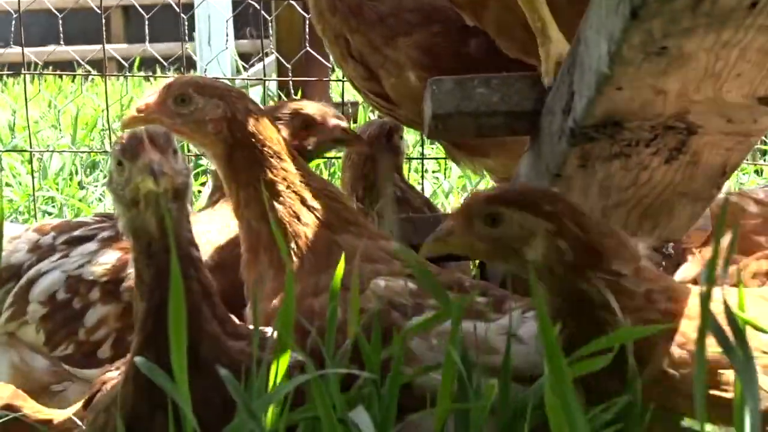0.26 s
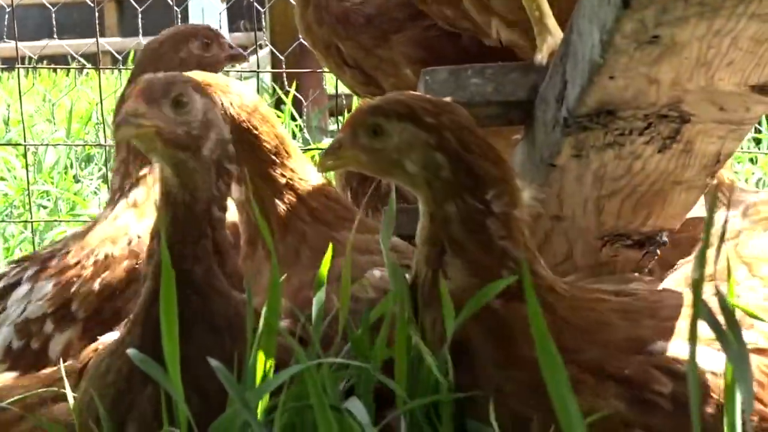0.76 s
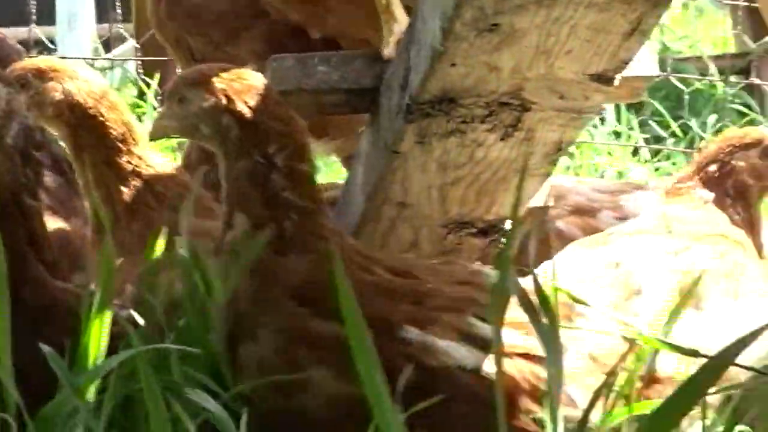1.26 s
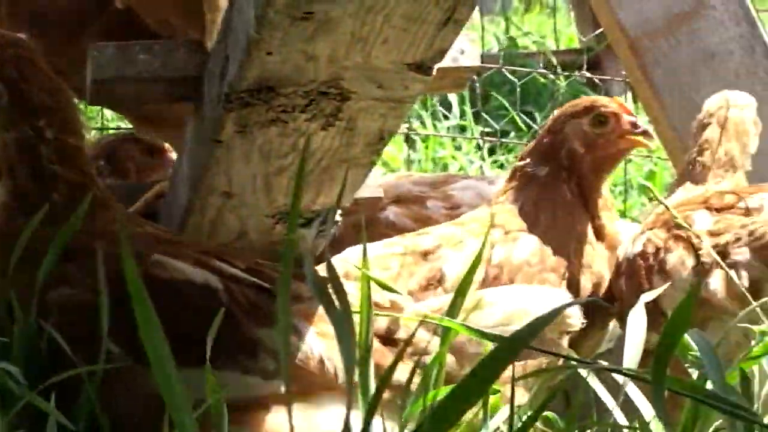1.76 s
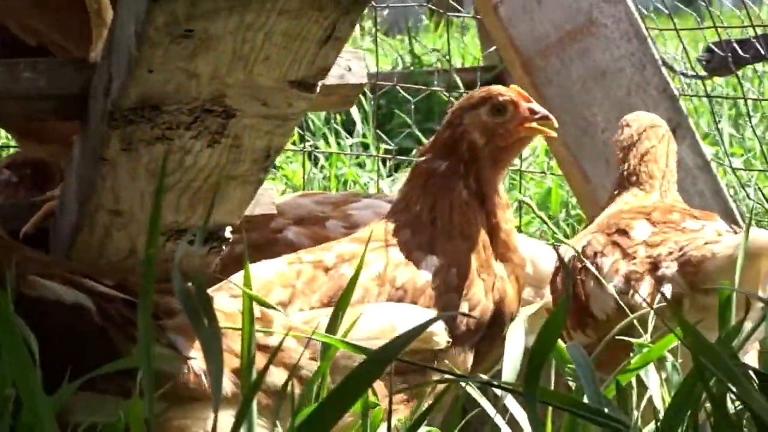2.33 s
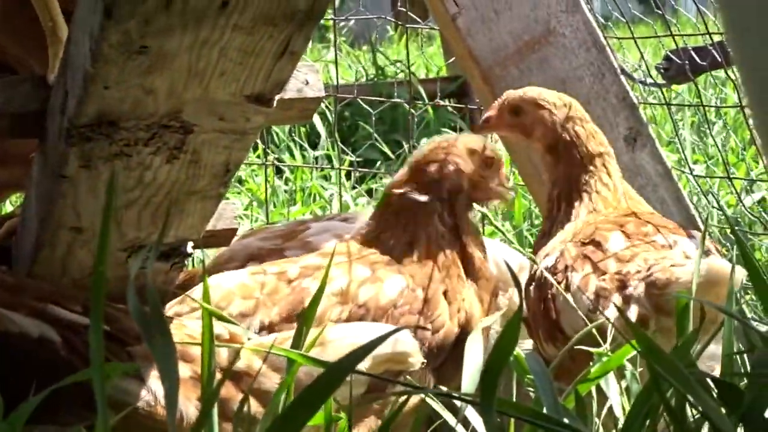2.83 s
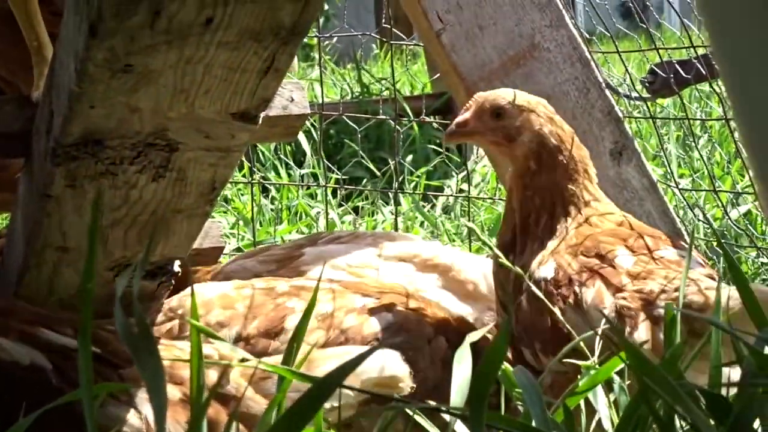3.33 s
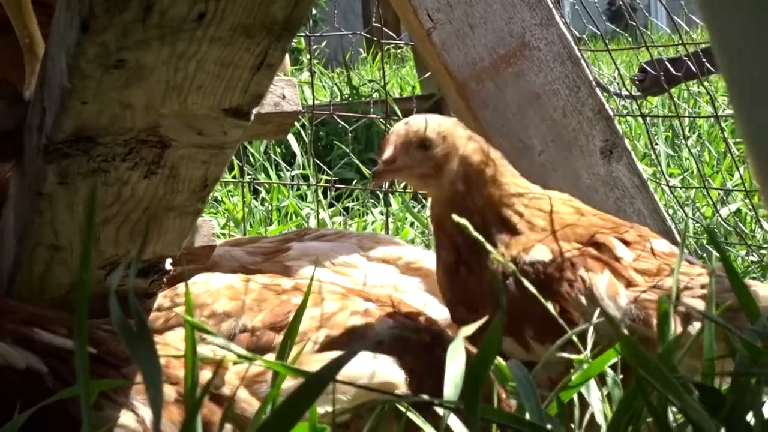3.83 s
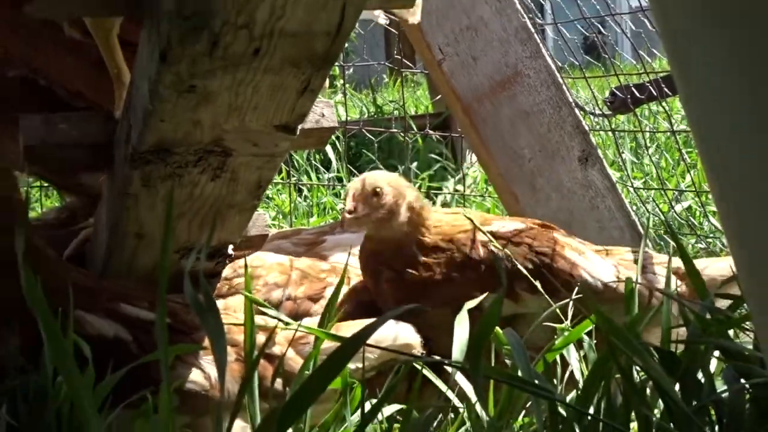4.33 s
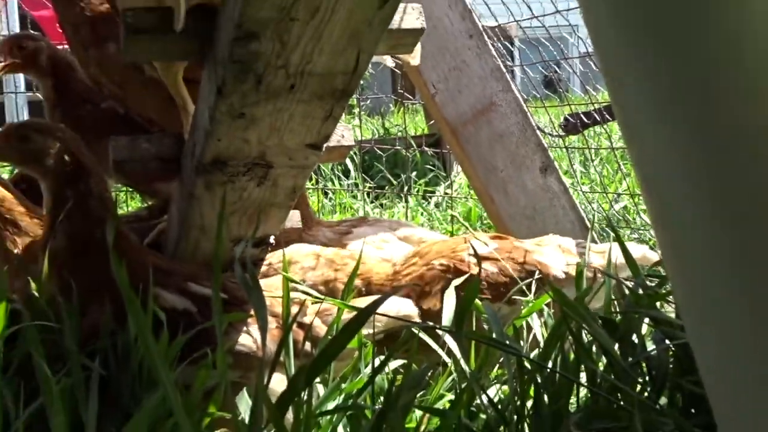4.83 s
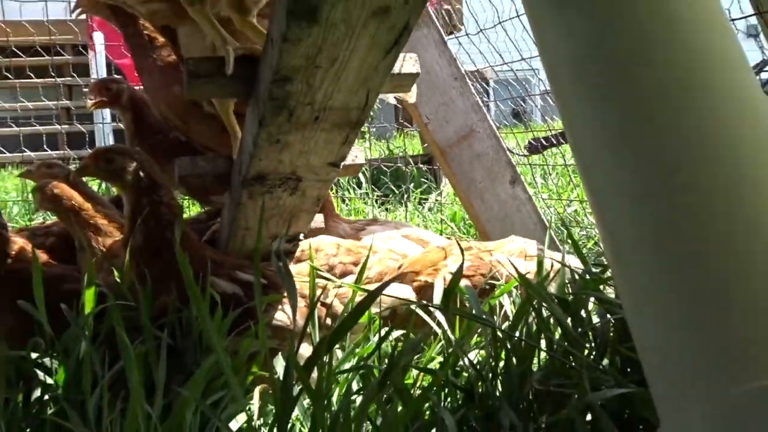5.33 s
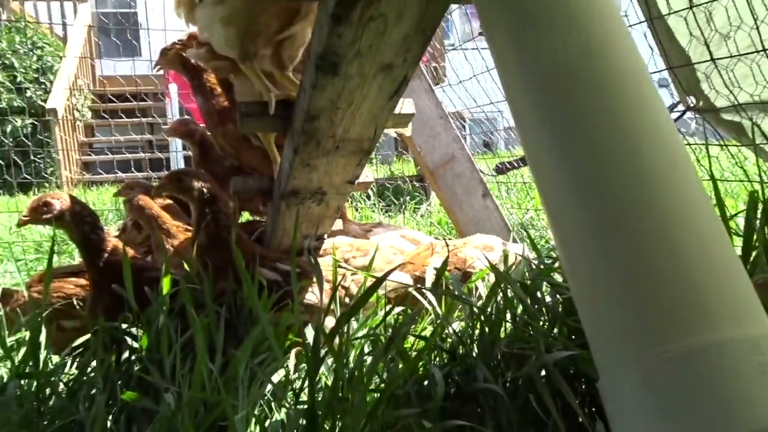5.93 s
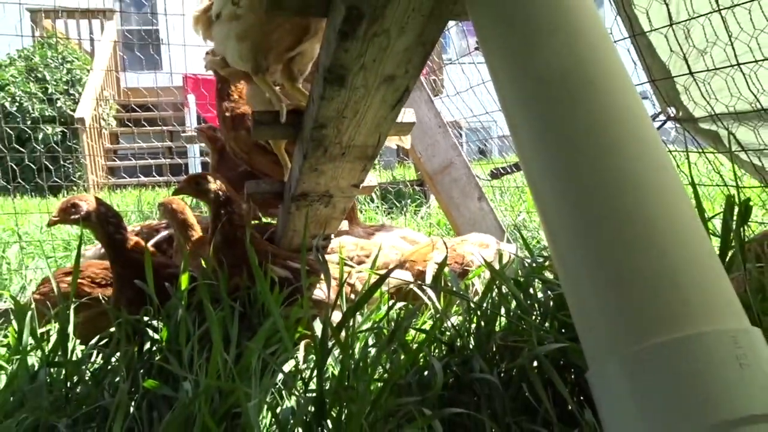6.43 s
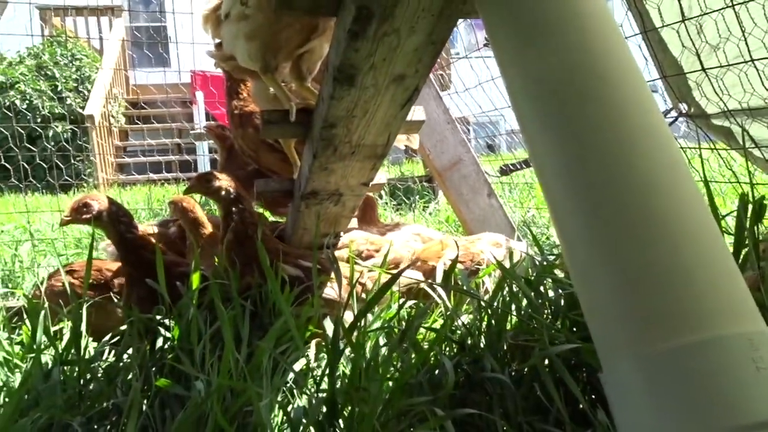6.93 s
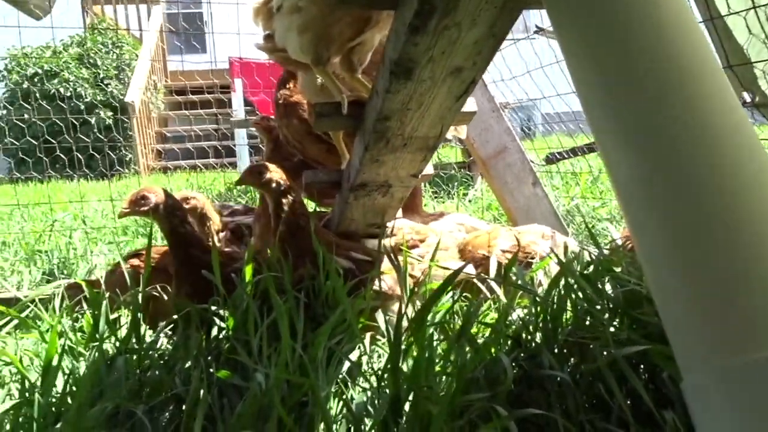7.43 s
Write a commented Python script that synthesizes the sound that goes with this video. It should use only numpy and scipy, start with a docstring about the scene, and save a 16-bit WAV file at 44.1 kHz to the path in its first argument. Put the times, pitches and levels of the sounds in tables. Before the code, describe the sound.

A quick burst of flapping, knocks and clucks settles into sparse hen peeps and thin whines, while a distant sparrow chirps over faint hiss.

```python
"""Quiet yard with a wooden coop: young hens rest in the grass, peeping, whining, yelping and clucking softly.
Voices are rough near-sines with gliding pitch. One hen gets up with a few wing flaps, made of swelling noise.
Feathers and grass rustle as crackling noise; beaks tick as noise bursts, feet thud and ring the frame's modes.
A sparrow chirps farther off in two-voiced slurs; faint background hiss and an insect trill lie behind."""
import sys
import numpy as np
from scipy import signal
from scipy.io import wavfile

SR = 44100
rng = np.random.default_rng(int(sys.argv[2]) if len(sys.argv) > 2 else 0)


def dump_mix(stems):
    """Bounce the given channels to the path in sys.argv[1] as a 16-bit WAV at rate SR."""
    frames = np.atleast_2d(stems).T  # one column per channel
    limited = np.clip(frames, -1, 1)  # hard clip at full scale
    pcm = np.round(limited * 32767).astype(np.int16)
    wavfile.write(sys.argv[1], SR, pcm)


N = 338230
TIME = np.arange(N) / SR
DROP_S, DROP_PITCH, DROP_DB = 0.0133, 0.866, -9   # closing drop of peeps and whines; pitch as a factor

# left-right likeness of diffuse noise: f/Hz, likeness/1
DIFFUSE_LIKENESS = [(60, .45), (200, 0.36), (1200, 0.053), (2500, 0.16), (5000, 0.018), (15000, 0.038)]
# left-right likeness of sounds right by the microphone: f/Hz, likeness/1
CLOSE_LIKENESS = [(60, .6), (200, 1), (1200, 0.13), (2500, 0.22), (5000, 0.046), (15000, .05)]
# treads in the bedding: height t/s, length/s, level/dB
BEDDING_TREADS = [(.1, 0.26, -46), (.23, 0.091, -45.5), (.38, 0.15, -51), (.58, 0.14, -58.5),
                  (1.78, 0.11, -58), (3.14, 0.22, -60.5)]


def from_db(db):
    """Decibels to gain."""
    return 10 ** (np.asarray(db) / 20)


def rms_one(x):
    """Scale to rms 1."""
    return x / np.sqrt(np.mean(x ** 2) + 1e-20)


def at_hz(points, hz):
    """Read a spectrum on a log-frequency axis."""
    points_hz, values = np.transpose(points)
    return np.interp(np.log(hz), np.log(points_hz), values)


def band(x, low_hz, high_hz):
    """Butterworth band-pass."""
    edges_hz = [low_hz, min(high_hz, .45 * SR)]
    return signal.sosfilt(signal.butter(2, edges_hz, "band", fs=SR, output="sos"), x + 1e-18)


def drift(rate_hz, size):
    """Random values about rate_hz times a second, joined by lines; spread about 1."""
    knots = np.arange(size) * rate_hz / SR + rng.random()
    values = rng.standard_normal(size // 8 + 3)
    return np.interp(knots, np.arange(size // 8 + 3), values) * np.sqrt(3 / 2)


def add(out, start_s, sound):
    """Mix a sound in at its time."""
    at = max(int(start_s * SR), 0)
    out[..., at:at + sound.shape[-1]] += sound[..., :max(N - at, 0)]


def swells(rows):
    """Bell-shaped rises of loudness, as gain."""
    return sum(from_db(db) * np.exp(-2 * ((TIME - s) / length_s) ** 2) for s, length_s, db in rows)


def noise(colour, likeness, patchy_db):
    """Half-octave bands of stereo noise, each with its own flicker and likeness; rms 1."""
    out, edges_hz = 0, np.geomspace(45, 17000, 18)
    white = rng.standard_normal((2, 2, N))
    for k, (low_hz, high_hz) in enumerate(zip(edges_hz, edges_hz[1:])):
        mid, side = band(white[k % 2], low_hz, high_hz)
        hz = np.sqrt(low_hz * high_hz)
        alike = np.clip(at_hz(likeness, hz), -1, 1)
        gain = from_db(at_hz(colour, hz) + patchy_db * drift(60, N))
        out = out + gain * (np.sqrt(1 + alike) * mid + np.sqrt(1 - alike) * side * [[1], [-1]])
    return rms_one(out)


def hens():
    """Peeps, whines with a buzz beneath, yelps, clucks that arch a little in pitch, and thin whistles."""
    # falling peeps: start t/s, length/s, first f/Hz, f before drop/Hz, bend/1 (over 1 falls late), level/dB,
    # loudest at share of length/1, roughness/1, left-right/dB, octave overtone/dB, beak resonance f/Hz
    peep_rows = [(0.027, 0.053, 3150, 2990, 0.83, -45.5, 0.85, 0.54, 0, -21, 5000),
                 (0.079, 0.05, 2460, 2252, 0.77, -30, 0.12, 0.12, 0.5, -15, 4370),
                 (0.317, 0.04, 3470, 3300, 2.2, -36, 0.44, 0.2, -2, -30, 5000),
                 (0.36, 0.094, 3025, 2130, 0.82, -30, 0.11, 0.3, 1, -12.5, 5000),
                 (0.551, 0.068, 3113, 2660, 0.82, -37, 1, 0.1, 2, -30, 5000),
                 (0.928, 0.042, 2720, 2650, 0.92, -46.5, 0.37, 0.05, -2, -28, 5000),
                 (1.115, 0.064, 2900, 2454, 1.06, -48, 0.48, 0.62, -1, -15, 5500),
                 (1.79, 0.095, 3300, 2250, 0.6, -40.5, 0.22, 0.06, 2.5, -12.5, 4950),
                 (2.011, 0.105, 3370, 2200, 0.7, -37, 0.22, 0.1, 3, -13, 5150),
                 (2.323, 0.06, 2940, 2380, 0.82, -44.5, 0.48, 0.03, 4, -28, 5000),
                 (4.037, 0.22, 3220, 2404, 8.5, -45.5, 0.88, 0, -3, -16.5, 6620),
                 (6.647, 0.063, 3020, 2360, 0.84, -49.5, 0.41, 0.3, 0, -24, 5300)]
    # whines: start t/s, length/s, top f/Hz, f before drop/Hz, catch/dB, hold/dB, swell/dB,
    # swell's height before end/s, roughness/1, left-right/dB, octave overtone/dB
    whine_rows = [(0.875, 0.096, 2547, 2160, -35, -38.5, -38, 0.012, 0.53, -3, -27),
                  (1.343, 0.12, 2650, 2257, -40.5, -42, -34, 0.019, 0.29, -5, -21),
                  (2.653, 0.22, 2656, 2302, -41.5, -49.5, -34.5, 0.024, 0.29, -4, -31),
                  (3.547, 0.12, 2725, 2384, -43.5, -42.5, -33, 0.047, 0.46, -3, -40),
                  (6.046, 0.11, 2407, 2265, -40.5, -45, -35, 0.042, 0.32, 2.5, -27)]
    # yelps: start t/s, length/s, first f/Hz, mid-length f/Hz, last f/Hz, level/dB, growth/dB, roughness/1
    yelp_rows = [(0.24, 0.021, 3180, 3015, 2320, -40, 9, 0.7),
                 (0.264, 0.028, 2930, 2670, 1980, -36, 9, 0.9),
                 (1.26, 0.028, 1566, 3000, 2140, -37, 7.5, 0.63),
                 (6.226, 0.022, 2285, 2030, 1880, -44.5, 2, 0.28),
                 (6.558, 0.029, 1404, 3010, 3620, -48, 2.5, 0.52),
                 (6.604, 0.015, 3490, 3320, 2300, -56, 12, 0.4),
                 (7.228, 0.038, 1500, 2740, 2050, -53, 4, 0.47),
                 (7.387, 0.0342, 2480, 2823, 2530, -44, 8, 0.65),
                 (7.424, 0.0076, 2170, 2190, 2480, -38, 8, 0.17),
                 (7.434, 0.018, 2700, 2596, 2160, -40.5, 7, 0.34),
                 (7.562, 0.015, 2260, 2866, 3020, -44, 3, 0.73),
                 (7.579, 0.022, 2680, 2437, 2580, -37.5, 5, 0.41)]
    # other side of the syrinx, buzzing below a whine: start t/s, length/s, f/Hz, level/dB
    buzz_rows = [(0.898, 0.016, 1630, -54.5), (1.342, 0.098, 1807, -51.5), (2.652, 0.046, 2106, -55),
                 (3.55, 0.1, 1997, -62.5), (6.045, 0.06, 1833, -55.5)]
    # low clucks: start t/s, length/s, nominal f/Hz, nominal glide/1 (pitch factor),
    # level/dB, overtone/dB, roughness/1
    cluck_rows = [(0.104, 0.01, 976, 0.72, -35, -8, 0.85), (0.136, 0.023, 794, 0.91, -35.5, -28, 0.15),
                  (0.229, 0.0067, 1252, 0.97, -24, -13, 0.34), (0.274, 0.01, 1233, 1.53, -28.5, -20, 0.18),
                  (0.325, 0.11, 1260, 1.05, -44.5, -0.5, 0.41), (0.469, 0.027, 1100, 0.937, -27, -20, 0.06),
                  (1.263, 0.058, 1237, 0.95, -59.5, 11, 0.4), (1.315, 0.051, 1216, 1.02, -53, 0, 0),
                  (1.767, 0.03, 676, 1.1, -58.5, -12, 0.23), (7.444, 0.0078, 1730, 0.74, -36, -16, 0.25),
                  (7.585, 0.01, 1670, 1.18, -31.5, -17, 0.16)]
    # thin level whistles of a resting bird: start t/s, length/s, f/Hz, nominal level/dB
    whistle_rows = [(2.131, 0.13, 2254, -64), (2.376, 0.1, 2352, -56), (2.579, 0.16, 2328, -56),
                    (2.88, 0.073, 2360, -55.5), (3.072, 0.13, 2425, -58.5), (6.884, 0.13, 2147, -66),
                    (7.094, 0.22, 2386, -64.5), (7.315, 0.19, 2516, -56.5)]
    yelp_overtone_db, yelp_half_db, yelp_pan_db = -17, -15, 0.5   # octave, half pitch, left-right
    buzz_rough, ear_lag_s = .7, .00005   # voices reach the right ear later
    # in a yelp the membranes slap hard and evenly
    croak = dict(rattle_hz=480, rattle_depth=.85, jitter=.04, shimmer_db=2, hoarse=.2,
                 beak_hz=4500, beak_width_hz=900)

    out, calls = np.zeros((2, N)), []
    for *gesture, pan_db, overtone_db, beak_hz in peep_rows:
        calls.append((syrinx(peep(*gesture), overtone_db, beak_hz, half_db=-16.5), pan_db))
    for *gesture, pan_db, overtone_db in whine_rows:
        calls.append((syrinx(whine(*gesture), overtone_db), pan_db))
    for gesture in yelp_rows:
        calls.append((syrinx(yelp(*gesture), yelp_overtone_db, half_db=yelp_half_db, **croak), yelp_pan_db))
    for (start_s, call), pan_db in calls:
        add(out, start_s, call * from_db([[pan_db / 2], [-pan_db / 2]]))
    for s, length_s, hz, db in buzz_rows:
        hold = [(s, hz, db, buzz_rough), (s + length_s, hz, db, buzz_rough)]
        add(out, *syrinx(hold, overtone_db=-25, rattle_hz=167.0, rattle_depth=0.45))
    out = band(band(out, 800, 13000), 800, 17000)   # a small throat radiates little below this
    for s, length_s, hz, glide, db, overtone_db, rough in cluck_rows:
        arch = [(s + .002, hz * .95 / glide ** .5, db - 1, rough),
                (s + length_s / 2, hz * 1.02, db, rough),
                (s + length_s - .002, hz * .97 * glide ** .5, db - 4, rough)]
        add(out, *syrinx(arch, overtone_db))
    for s, length_s, hz, db in whistle_rows:
        arch = [(s, hz, db - 4, .06), (s + length_s / 2, hz, db + 1, .06), (s + length_s, hz, db - 5, .06)]
        add(out, *syrinx(arch, overtone_db=-40, waver=.005, edge_s=.025))
    return np.array([out[0], np.interp(TIME - ear_lag_s, TIME, out[1])])


def peep(start_s, length_s, first_hz, late_hz, bend, db, loudest, rough):
    """After a faint lead-in the pitch sags while the note swells, clears and fades. Rows: t/s, f/Hz, dB, rough."""
    lead_s, lead_db, onset_s = .022, -17, 0.0066   # lead-in on the first pitch
    rise_db_per_s, fade_db_per_s = 116, 69   # towards and away from the loudest moment
    clear_s, fuzz_per_s = .05, 5   # fuzz has cleared this long before the loudest moment
    sag_hz_per_s = 1400
    t = np.linspace(0, length_s, num=40)
    sag_hz = sag_hz_per_s * t
    hz = first_hz - sag_hz - (first_hz - sag_hz[-1] - late_hz) * (t / length_s) ** bend
    past_s = t - loudest * length_s
    level_db = db + np.minimum(rise_db_per_s * past_s, -fade_db_per_s * past_s)
    fuzz = rough + fuzz_per_s * np.maximum(-past_s - clear_s, 0)
    faint_db = min(db + lead_db, level_db[0])
    lead_in = [(start_s - ahead_s, first_hz, faint_db, fuzz[0]) for ahead_s in (lead_s + onset_s, onset_s)]
    return np.vstack([lead_in, with_drop(start_s + t, hz, level_db, fuzz)])


def whine(start_s, length_s, top_hz, late_hz, catch_db, hold_db, swell_db, before_end_s, rough):
    """A leap upwards, then a rough, sinking hold that clears as it swells."""
    catch_s, catch_pitch, catch_rough = 0.0116, .74, 0.21   # leaps from this share of the top pitch
    swell_share, swell_rough = 0.27, 0.022   # share of the length; roughness left at the height
    break_s, break_db = 0.016, -5.5   # the voice thins briefly after its leap
    bend, fade_db_per_s = .7, 273   # bend under 1 sinks early; fade after the swell
    t = np.linspace(0, length_s, num=80)
    height_s = length_s - before_end_s
    rise_s = max(height_s - swell_share * length_s, catch_s)
    sunk = np.interp(t, [catch_s, length_s - DROP_S], [0, 1]) ** bend
    hz = (top_hz + (late_hz - top_hz) * sunk) * np.interp(t, [0, catch_s], [catch_pitch, 1])
    turns_s = [0, catch_s, rise_s, height_s]
    level_db = np.interp(t, turns_s, [catch_db, hold_db, hold_db, swell_db])
    level_db = level_db - fade_db_per_s * np.maximum(t - height_s, 0)
    level_db = level_db + break_db * np.exp(-((t - catch_s - break_s) / break_s) ** 2)
    roughness = np.interp(t, turns_s, [catch_rough, rough, rough, swell_rough])
    return with_drop(start_s + t, hz, level_db, roughness)


def with_drop(s, hz, level_db, rough):
    """As the air runs out, pitch and level drop. Rows: t/s, f/Hz, level/dB, roughness/1."""
    closing = np.interp(s, [s[-1] - DROP_S, s[-1]], [0, 1])
    return np.transpose([s, hz * DROP_PITCH ** closing, level_db + DROP_DB * closing ** 2, rough])


def yelp(start_s, length_s, first_hz, middle_hz, last_hz, db, growth_db, rough):
    """One quick arch of pitch, rough throughout."""
    edge_db = -0.5   # both ends against the middle
    u = np.linspace(-1, 1, num=21)
    hz = middle_hz + (last_hz - first_hz) / 2 * u + ((first_hz + last_hz) / 2 - middle_hz) * u ** 2
    level_db = db + growth_db * u / 2 + edge_db * u ** 2
    return np.transpose([start_s + length_s * (u + 1) / 2, hz, level_db, np.full_like(u, rough)])


def syrinx(rows, overtone_db, beak_hz=5050, beak_width_hz=520, half_db=-45, rattle_hz=450, jitter=0.052,
           rattle_depth=0.22, shimmer_db=6.0, waver=0.0068, hoarse=0.35, edge_s=.003):
    """A near sine whose membranes rattle when rough: side tones, half-pitch lines. Returns (start/s, sound)."""
    s, hz, level_db, rough = np.transpose(rows)
    t = np.arange(s[0] - edge_s, s.max() + edge_s, 1 / SR)
    hz, level_db, rough = (np.interp(t, s, column) for column in (hz, level_db, np.clip(rough, 0, 1)))
    n = len(t)
    wobble = 1 + waver * drift(148.9, n) + jitter * rough * drift(586.8, n)
    phase = 2 * np.pi * np.cumsum(hz * wobble) / SR
    rattle = 2 * np.pi * np.cumsum(rattle_hz * (1 + 0.13 * drift(102.9, n))) / SR
    swell = (1 + rattle_depth * rough * np.sin(rattle)) * from_db(shimmer_db * rough * drift(256.0, n))
    swell /= np.sqrt(1 + rough ** 2)
    # above 1800 Hz the octave follows a beak resonance; low clucks keep theirs
    resonance = 1 / (1 + ((2 * hz - beak_hz) / beak_width_hz) ** 2) ** np.where(hz > 1800, 1, 0)
    overtone = from_db(overtone_db) * resonance * from_db(4.5 * drift(90, n)) * np.sin(2 * phase)
    # strong and weak cycles alternate
    halves = from_db(half_db) * rough * (np.sin(phase / 2) + .5 * np.sin(phase + phase / 2))
    rasp = hoarse * rough * drift(1800, n) * np.sin(phase + 1)   # turbulent air smears a rough note
    tone = np.sin(phase) + overtone + halves + rasp
    to_edge_s = np.minimum(t - t[0], t[-1] - t)
    fade = np.sin(np.pi / 2 * np.clip(to_edge_s / (1.83 * edge_s), 0, 1)) ** 2
    return t[0], np.sqrt(2) * from_db(level_db) * fade * swell * tone


def wings():
    """Flaps and feather flicks: each stroke is a short swell of feathers sliding over one another."""
    # strokes: height t/s, length/s, level/dB
    strokes = [(0.125, 0.017, -35), (0.17, 0.006, -31), (0.184, 0.022, -25), (3.108, 0.044, -67),
               (5.567, 0.026, -55.5), (6.742, 0.017, -52.5), (6.77, 0.017, -47)]
    # feather noise: f/Hz, relative density/dB
    feather_colour = [(70, -44), (250, -20.5), (900, -18), (2200, -1.5), (4300, -6.5), (7000, -8.5),
                      (11000, -7), (16000, -12)]
    flutter = from_db(2.0 * drift(900, N))
    return swells(strokes) * flutter * noise(feather_colour, CLOSE_LIKENESS, patchy_db=2.5)


def ticks(crack_t60_s=0.016, tail_t60_s=0.054, tail_db=-26, body_db=-2, edge_db=-2, middle_db=-7, snap_db=13):
    """Pecks and snapping stalks: a sharp snap, a short dry crack and a faint tail."""
    # nominal t/s, peak/dB, low band before body_db/dB, high band before edge_db/dB
    tick_rows = [(0.123, -14, -9.5, -10), (0.17, -22, 3, -6), (0.18, -25, -3, 4), (0.845, -29, -10, -1.5),
                 (2.866, -36, -7, -7), (3.061, -35.5, 16, -16), (3.118, -33.5, -1.5, -12),
                 (3.728, -40, -4, -6), (3.74, -21.5, -9, -6), (3.776, -33, 5, 1), (3.85, -44, -4, 7),
                 (4.406, -28.5, 6, 20.5), (4.425, -35, -30, 1), (4.57, -41.5, -11, -5.5),
                 (4.776, -33.5, -27, 3), (5.778, -37, -21, -3), (5.834, -44, 2, -23), (6.414, -38, -19, -7),
                 (6.522, -45, -8, -5)]
    out, t = np.zeros((2, N)), TIME[:SR // 15]
    decay = from_db(-60 * t / crack_t60_s) + from_db(tail_db - 60 * t / tail_t60_s)
    for s, db, low_db, high_db in tick_rows:
        burst = rng.standard_normal((3, len(t))) * decay + from_db(snap_db) * (t == 0)
        body = from_db(low_db + body_db) * rms_one(band(burst[2], 1480, 3320))
        middle = from_db(middle_db) * rms_one(band(burst[:2], 4500, 7700))
        edge = from_db(high_db + edge_db) * rms_one(band(burst[:2], 12000, 21000))
        crack = body + middle + edge
        add(out, s + 0.00012, from_db(db) * crack / np.abs(crack).max())
    return out


def steps(wood_t60_s=0.094, ring_db=-19, thump_db=-15, thump_t60_s=0.056):
    """A foot thuds on a board with a lower thump and rings the frame; treading claws scuff along it."""
    # feet on the wooden frame: t/s, thud peak/dB, board f/Hz
    step_rows = [(0.126, -29.5, 640), (0.177, -26, 936), (0.38, -33, 657), (0.701, -46.5, 880),
                 (1.775, -44.5, 1000), (1.795, -58, 730), (3.061, -48.5, 965), (3.144, -41.5, 1320),
                 (3.726, -49.5, 467), (3.792, -53.5, 455), (6.767, -46.5, 1150)]
    scuffs_per_s, scuff_spread_db, scuff_db = 160, 3.5, -8   # scuff_db against the tread
    out, blows, t = np.zeros(N), np.zeros(N), TIME[:SR // 10]
    for s, db, hz in step_rows:
        thud = band(rng.standard_normal(len(t)) * from_db(-60 * t / wood_t60_s), hz * 0.71, hz * 1.6)
        thump = band(rng.standard_normal(len(t)) * from_db(-60 * t / thump_t60_s), hz * 0.33, hz * .6)
        blow = thud / np.abs(thud).max() + from_db(thump_db) * thump / np.abs(thump).max()
        add(out, s, from_db(db) * blow)
        blows[int(s * SR)] = from_db(db + ring_db)
    hits = rng.random(N) < scuffs_per_s / SR
    scuffs = hits * from_db(scuff_spread_db * np.minimum(rng.exponential(1, N), 3))
    return out + frame(blows) + from_db(scuff_db) * swells(BEDDING_TREADS) * rms_one(frame(scuffs))


def frame(clicks):
    """Every contact rings the frame's modes as two-pole resonators, each with a random strength."""
    # modes of the wooden frame: f/Hz, level/dB, t60/s
    modes = [(275, -8.5, 0.073), (460, -4.5, 0.1), (649, -0.5, 0.18), (797, 7, 0.066), (1060, 1, 0.051),
             (1288, 10, 0.097), (1500, -2.5, .06)]
    out = 0
    for hz, db, t60_s in modes:
        r, w = from_db(-60 / (t60_s * SR)), 2 * np.pi * hz / SR
        struck = clicks * rng.standard_normal(N) + 1e-18
        out = out + from_db(db) * signal.lfilter([.5, 0, -.5], [1, -2 * r * np.cos(w), r * r], struck)
    return out


def rustle(swish_db=5, ruffle_db=7.0):
    """Plumage swishes finely; grass, litter and scratched ground crunch lower down."""
    # stirring of the flock: t/s, feather level before swish_db/dB
    stir_rows = [(0.0, -47.5), (0.47, -51), (0.68, -61), (1.0, -59), (1.47, -56.5), (1.77, -59),
                 (2.24, -55), (2.43, -66), (2.58, -73), (3.4, -69.5), (3.61, -62), (4.08, -76), (5.49, -85),
                 (5.75, -74.5), (6.13, -77.5), (6.84, -74.5), (7.56, -58.5), (7.67, -58)]
    # single ruffles of plumage: height t/s, length/s, level before ruffle_db/dB
    ruffle_rows = [(.54, 0.16, -51), (2.33, 0.087, -54.5), (3.12, 0.094, -60), (3.53, 0.067, -55.5),
                   (3.66, 0.021, -58.5), (7.15, 0.1, -64.5)]
    # claws scratching dry ground: height t/s, length/s, level/dB
    scratch_rows = [(.27, 0.14, -45.5), (4.09, 0.05, -64), (4.42, 0.22, -70.5), (6.30, 0.011, -58),
                    (6.355, 0.14, -60)]
    # plumage noise: f/Hz, relative density/dB
    swish_colour = [(600, -22.5), (1300, -8), (2300, 1), (4200, 5.5), (7000, 2.5), (11000, 1),
                    (16000, -1.5)]
    # grass and litter noise: f/Hz, relative density/dB
    litter_colour = [(60, -11), (170, -36), (280, -9.5), (400, -10), (780, 4), (1500, 2.5), (3000, 4.5),
                     (8000, -29.5)]
    litter_db, litter_follows = -67, 0.41   # level at mean stir; share of the stir's dB swing
    stir_db = np.interp(TIME, *np.transpose(stir_rows))
    plumage = np.hypot(from_db(stir_db + swish_db), from_db(ruffle_db) * swells(ruffle_rows))
    litter = from_db(litter_db + litter_follows * (stir_db - stir_db.mean()))
    bedding = np.hypot(litter, swells(BEDDING_TREADS))
    swish = plumage * crackle(grain_db=3.5, per_s=890) * noise(swish_colour, DIFFUSE_LIKENESS, patchy_db=1.5)
    crunch = bedding * crackle(grain_db=4.0, per_s=460) * noise(litter_colour, CLOSE_LIKENESS, patchy_db=-1.0)
    ground = rms_one(band(rng.standard_normal(N), 1390, 2830))
    scratch = swells(scratch_rows) * crackle(grain_db=7.0, per_s=2000) * ground
    return swish + crunch + scratch


def crackle(grain_db, per_s):
    """Loudness of many tiny slips that come at random and die within milliseconds; rms 1."""
    slips = (rng.random(N) < per_s / SR) * from_db(grain_db * np.minimum(rng.exponential(1, N), 5))
    power = signal.lfilter([1], [1, -np.exp(-1 / (0.0077 * SR))], slips ** 2)
    return rms_one(np.sqrt(power + 0.5 * power.mean()))


def boards(x):
    """Strong early reflections: a gliding note beats against them."""
    # boards and ground close by: left delay/s, right delay/s, level/dB
    reflections = [(.0019, 0.0045, -36.5), (.0043, 0.0043, -6), (.0071, 0.011, -10.5)]
    out = 0
    for left_s, right_s, db in reflections:
        delayed = [np.interp(TIME - delay_s, TIME, side, left=0) for delay_s, side in zip((left_s, right_s), x)]
        out = out + from_db(db) * np.array(delayed)
    return out


def echoes(x, t60_s, per_s, first_s):
    """Scattered reflections that die away, different at each ear, of fixed total energy."""
    t = TIME[:SR // 2]
    hits, signs = rng.random((2, len(t))) < per_s / SR, rng.choice([-1, 1], (2, len(t)))
    arrivals = hits * signs * (t > first_s)
    response = band(arrivals * from_db(-60 * t / t60_s), 710, 19000)
    response /= np.sqrt(np.sum(response ** 2, axis=1, keepdims=True) * SR / (2 * 8100))
    return signal.fftconvolve(x, response, axes=1)[:, :N]


def sparrow():
    """Two-note chirps; as the first note falls the other side of the syrinx joins lower and flutters against it."""
    # chirps: start t/s, level/dB, lower voice's rebound in the second note/1 (negative sinks)
    chirp_rows = [(0.403, -37, 1.7), (1.137, -40, .9), (3.377, -42, 1.12), (5.103, -49.5, -0.0039),
                  (6.072, -50.5, 0.8), (6.913, -41, 1.34)]
    # common shape, two slurred notes: t from start/s, f/Hz, relative level/dB, roughness/1
    upper_side = [(0, 4150, -12, .1), (.008, 4650, -1, .2), (.034, 4850, -1, .3), (.039, 4100, -1, .7),
                  (.052, 3450, -3, .7), (.074, 3250, -10, .6), (.086, 3050, -9, .3), (.093, 3130, 3, .25),
                  (.108, 3500, -2, .6), (.121, 4080, 0, .4), (.13, 3300, 1, .6), (.142, 3000, -7, .6)]
    second_note_s, second_note_hz = .09, 3130
    other_side_pitch, other_side_db = .93, -4   # against the upper voice
    out = np.zeros((2, N))
    for s, db, rebound in chirp_rows:
        other_side = []
        for t, hz, level_db, rough in upper_side[2:]:
            if t > second_note_s:
                hz = second_note_hz + rebound * (hz - second_note_hz)
            other_side.append((t, other_side_pitch * hz, level_db + other_side_db, rough))
        for rows in (upper_side, other_side):
            start_s, call = syrinx(rows, overtone_db=-52, rattle_hz=300, rattle_depth=.7, jitter=.035, hoarse=.15)
            add(out, s + start_s, from_db(db) * call)
    return out


def background_hiss():
    """Steady background hiss, flickering slightly in each band."""
    # background hiss: f/Hz, relative density/dB
    hiss_colour = [(50, -52), (100, -37), (250, -8), (750, 1), (1300, -13), (2500, -1.5), (4000, -28),
                   (5400, 0), (12000, -11), (15000, -4.5)]
    return from_db(-69.5) * noise(hiss_colour, DIFFUSE_LIKENESS, patchy_db=2.0)


def insects(hz=5400, level_db=-78, throb_db=1.5):
    """A faint trill far off in the grass: narrow-band noise, throbbing irregularly."""
    trill = rms_one(band(rng.standard_normal((2, N)), hz - 130, hz + 130))
    return from_db(level_db + throb_db * drift(32, N)) * trill


def scene():
    """Hens under the close boards of the coop, the sparrow across the yard."""
    voices, knocks, far = hens(), ticks() + steps() + wings(), sparrow()
    near = voices + knocks
    coop = boards(voices) + from_db(-17) * echoes(near, t60_s=.06, per_s=2000, first_s=.002)
    yard = from_db(-16.5) * echoes(near, t60_s=0.29, per_s=450, first_s=0.0059)
    yard = yard + from_db(-8) * echoes(far, t60_s=0.36, per_s=1200, first_s=.003)
    background = background_hiss() + insects()
    return near + from_db(-12.5) * far + coop + yard + rustle() + background


def record(dry):
    """The small microphone thins the bass; the top is cut steeply."""
    cutoff_hz = 16100
    thin = signal.sosfilt(signal.butter(1, 90, "high", fs=SR, output="sos"), dry)
    return signal.sosfilt(signal.ellip(10, .3, 70, cutoff_hz, fs=SR, output="sos"), thin)


dry = scene()
out = record(dry)
dump_mix(out)
```